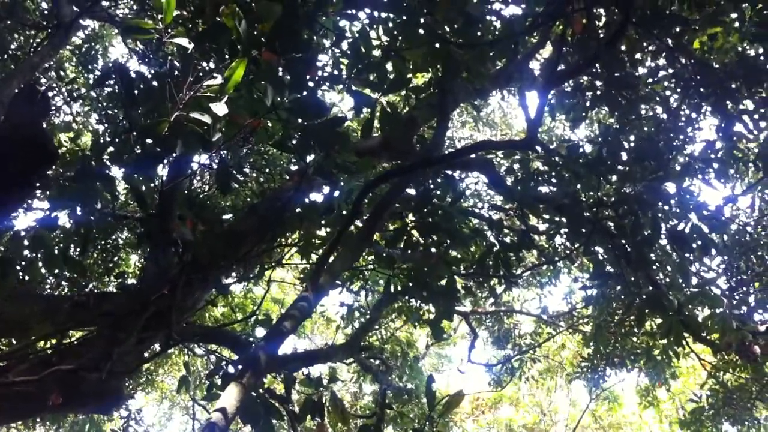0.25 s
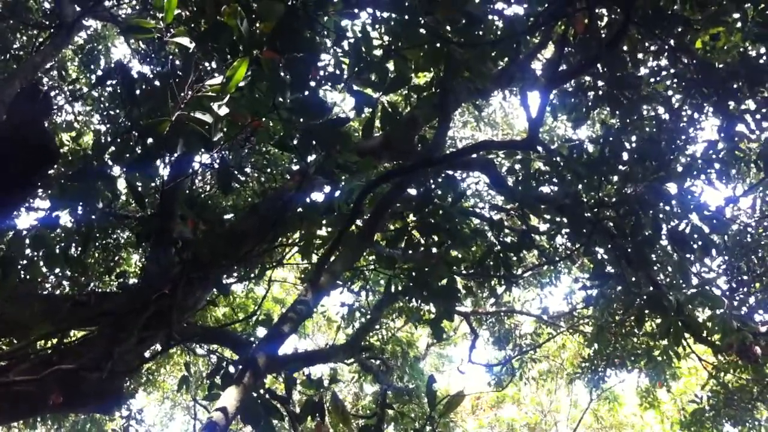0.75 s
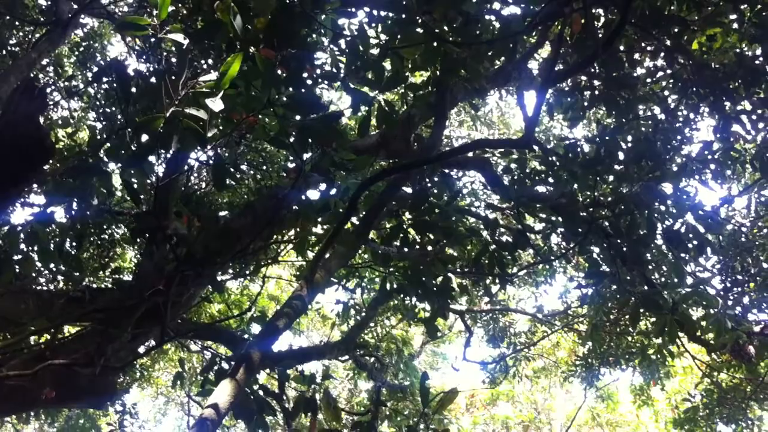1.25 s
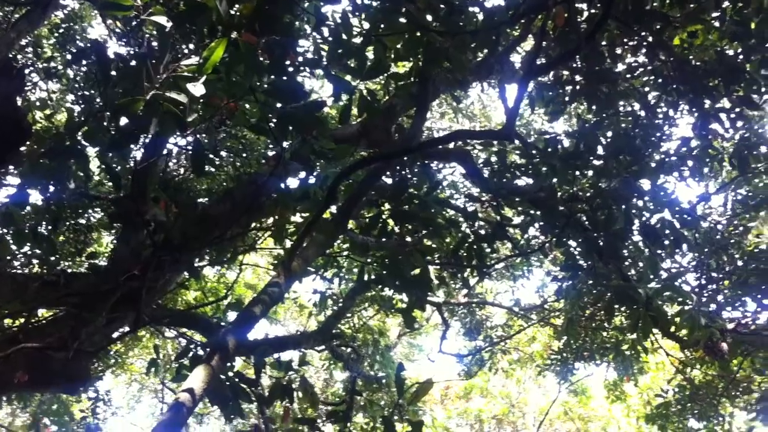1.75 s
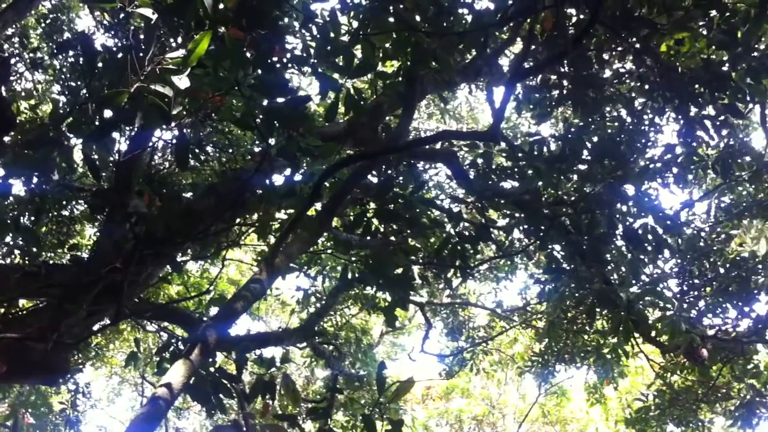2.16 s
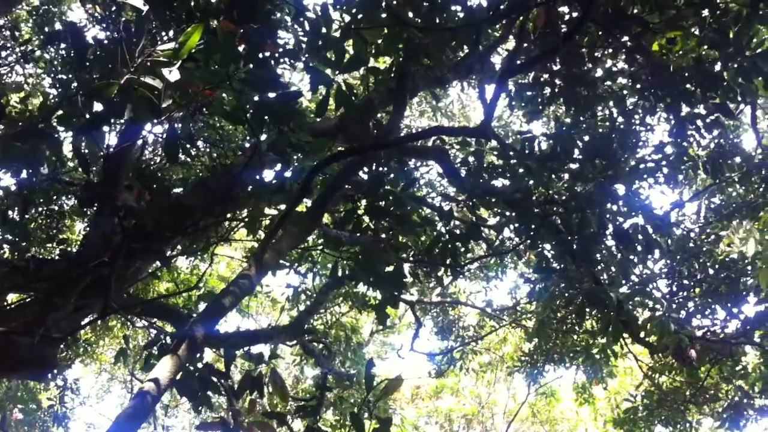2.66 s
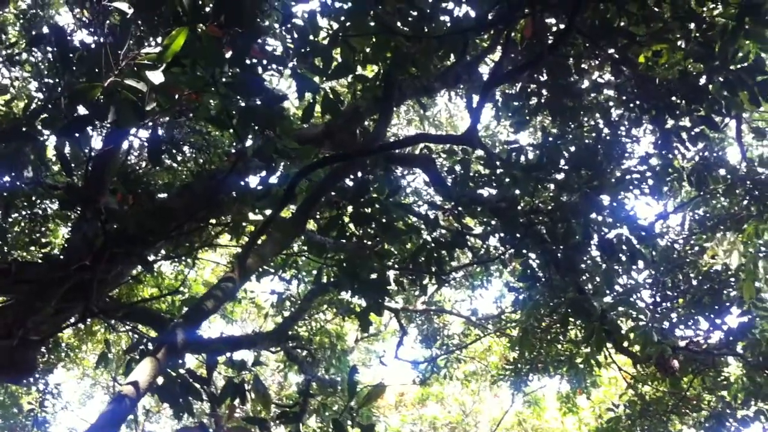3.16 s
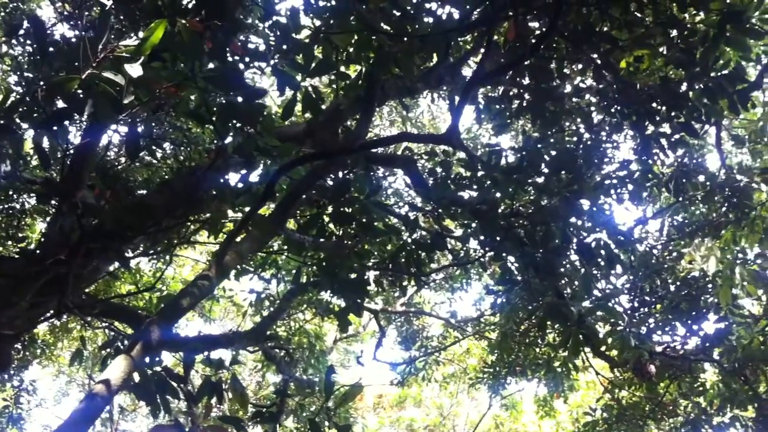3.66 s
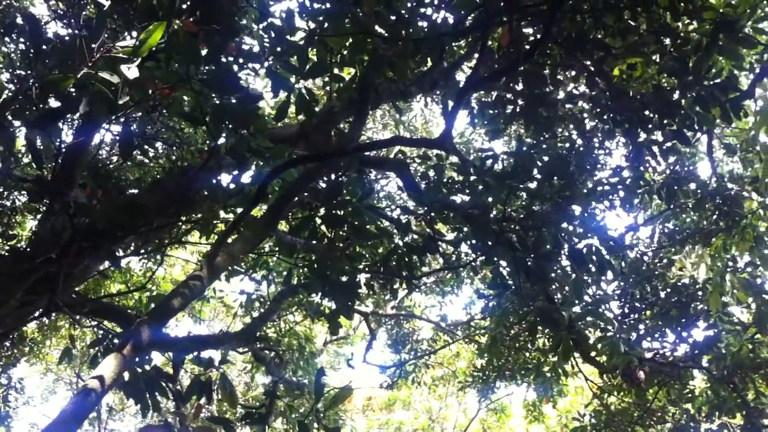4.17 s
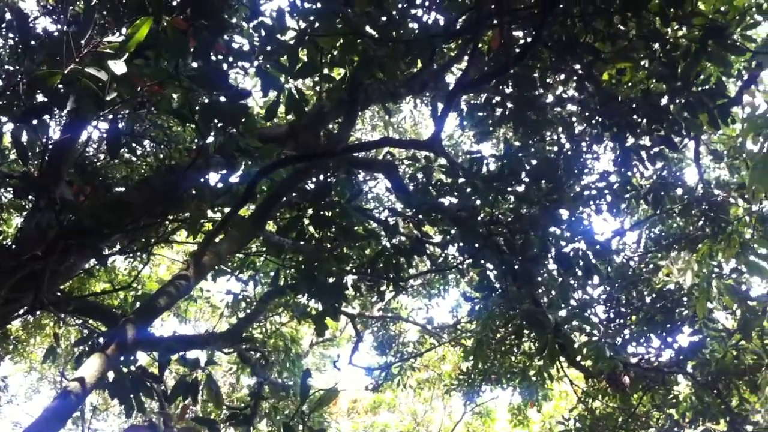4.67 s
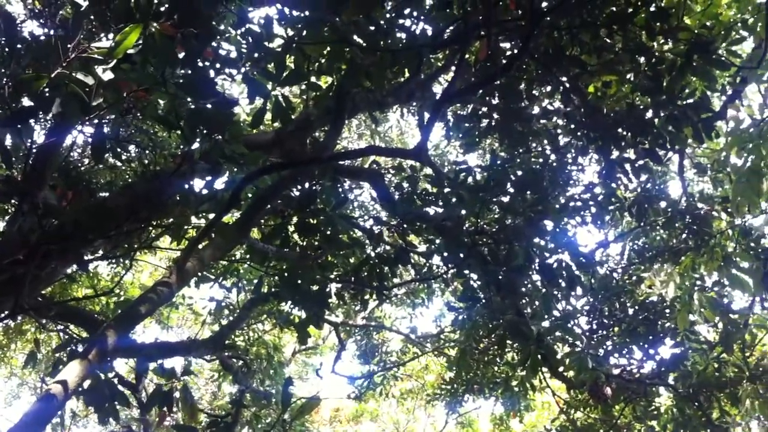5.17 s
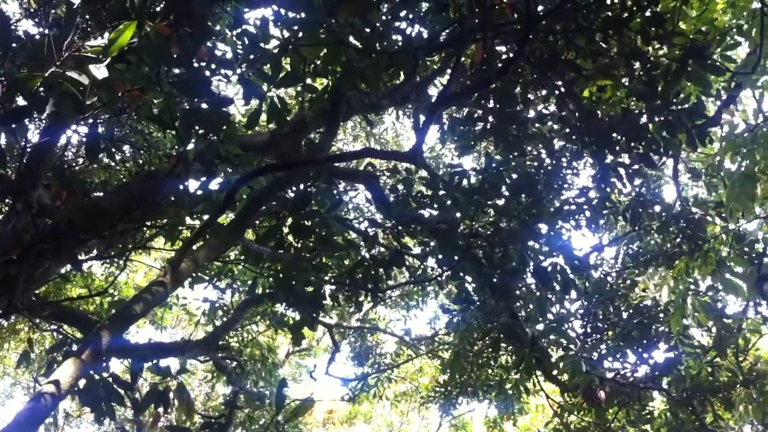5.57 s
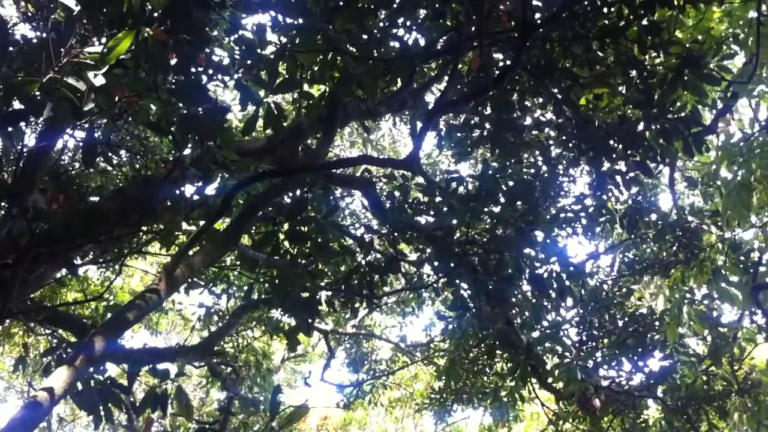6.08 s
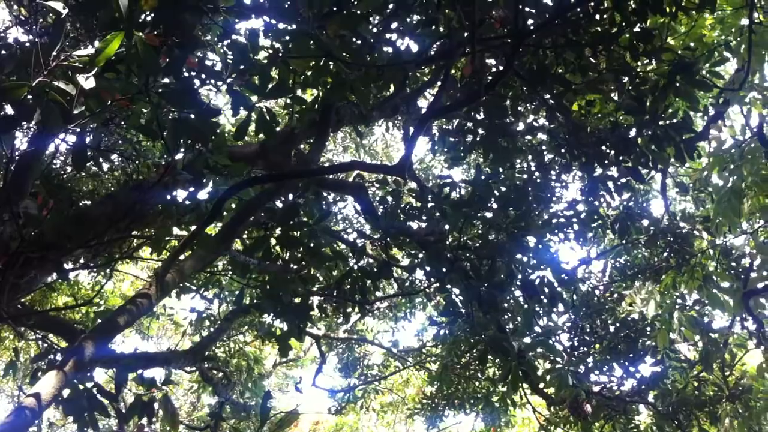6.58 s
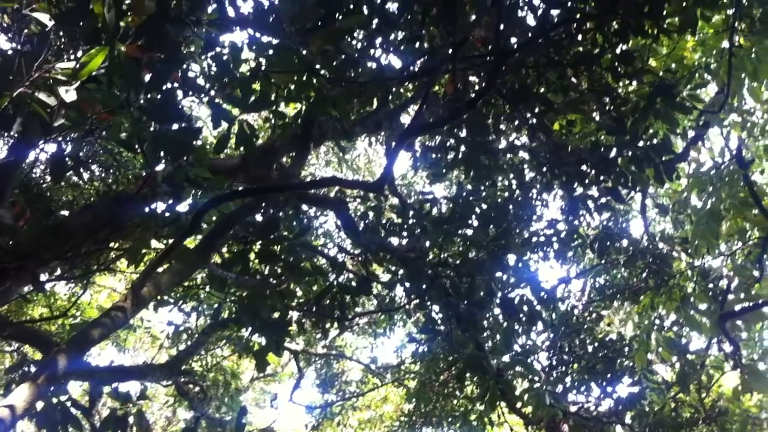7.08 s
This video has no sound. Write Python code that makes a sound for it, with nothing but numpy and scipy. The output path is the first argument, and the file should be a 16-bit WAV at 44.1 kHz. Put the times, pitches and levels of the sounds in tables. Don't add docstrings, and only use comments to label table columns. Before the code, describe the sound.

Quiet forest air with faint distant rumble and hiss, a soft knock on the microphone. At about half a second cicadas swell abruptly into a bright, piercing buzz, with nearer insects giving short gliding notes and raspy chirps. The chorus fades gradually and the chirps become rarer. A far bird keeps whooping low in quick clusters, clearer once the insects quieten; a small buzz returns near the end.

```python
import sys
import numpy as np
from scipy import signal
from scipy.fft import rfft, irfft, next_fast_len
from scipy.io import wavfile
from scipy.ndimage import uniform_filter1d

SR = 44100
rng = np.random.default_rng(int(sys.argv[2]) if len(sys.argv) > 2 else 0)


def log_audio(samples):
    frames = np.atleast_2d(samples).T
    limited = np.clip(frames, -1, 1)
    pcm = np.round(limited * 32767).astype(np.int16)
    wavfile.write(sys.argv[1], SR, pcm)


def gain_from_decibels(decibels):
    exponent = np.asarray(decibels, float) / 20
    return 10 ** exponent


N = 323253

# frequency_hz, density_db [dB per Hz]
CLICK_SPECTRUM = [(1200, -20), (3000, -9.5), (4800, 3), (6500, 4.5), (9000, 1), (10500, -8.5), (12000, -7),
                  (16000, -10.5)]


def unit(x):
    return x / np.sqrt(np.mean(np.abs(x) ** 2) + 1e-20)


def curves(rows):
    s, *cols = np.transpose(rows)
    return [np.interp(np.arange(N) / SR, s, c) for c in cols]


def wobble(rate, size=N):
    knots = rng.standard_normal(int(size * rate / SR) + 4)
    return np.interp(np.arange(size) * rate / SR, np.arange(len(knots)), knots)


def coloured(spectrum):
    m = next_fast_len(N)
    hz, db = np.transpose(spectrum)
    log_hz = np.log(np.fft.rfftfreq(m, 1 / SR) + 1)
    gain = gain_from_decibels(np.interp(log_hz, np.log(hz), db))
    return unit(irfft(rfft(rng.standard_normal(m)) * gain, m)[:N])


def trees(x, t60):
    t = np.arange(SR // 3) / SR
    tail = rng.standard_normal(len(t)) * gain_from_decibels(-60 * t / t60)
    tail = (tail / np.linalg.norm(tail)).astype(x.dtype)
    return signal.oaconvolve(x, tail[None], axes=1)[:, :N]


def song(pitch_hz, up, down, jitter, count, ribs=7.4):
    phase = 2 * np.pi * np.cumsum(pitch_hz) / SR + rng.uniform(0, 99.43)
    slow = 2 * np.pi * np.cumsum(pitch_hz / ribs) / SR
    beat = np.exp(1j * slow)
    throb = 1 + up * beat + down / beat + 0.03 * beat ** 2 + 0.13 * np.cos(slow / 2)
    turn = np.exp(1j * (phase + jitter * wobble(500, len(phase)))).astype(np.complex64)
    harmonics = np.cumprod(np.tile(turn, (count, 1)), axis=0)
    lag = np.exp(2j * np.pi * rng.random((count, 1))).astype(np.complex64)
    return (throb.astype(np.complex64) * lag * harmonics).real


def air():
    # frequency_hz, density_db [dB per Hz]
    rumble_spectrum = [(12, -54), (20, -34), (32, -46), (54, -36), (88, -13.5), (124, -10), (169, 0),
                       (586, -17.5), (938, -20.5), (1100, -20.5), (1500, -22.5), (1950, -8), (3300, -120)]
    # frequency_hz, density_db [dB per Hz]
    hiss_spectrum = [(1200, -14), (3000, -4.5), (4800, -5.5), (6500, -3), (9000, -3), (10500, -9),
                     (12000, -9), (16000, -3.5)]
    settled_db, start_excess_db, settling_s = -63.5, 3.5, 4.1
    rumble_db = settled_db + start_excess_db * np.exp(-np.arange(N) / SR / settling_s)
    rumble = gain_from_decibels(rumble_db + 1.26 * wobble(7.4)) * coloured(rumble_spectrum)
    return rumble + gain_from_decibels(-63.5 + 1.7 * wobble(4.9)) * coloured(hiss_spectrum)


def bumps():
    # start_s, peak_db, pitch_hz
    touches = [
        (0.049, -55, 110),
        (0.799, -61, 110),
        (1.054, -50.5, 113),
    ]
    out, t = np.zeros(N + SR), np.arange(SR // 10) / SR
    pulse = np.sin(np.pi * np.clip(t / 0.021, 0, 1))
    for s, db, hz in touches:
        out[round(s * SR):][:len(t)] += gain_from_decibels(db) * pulse * np.sin(2 * np.pi * hz * t)
    return out[:N]


def bird():
    # first_s, last_s, whoop_count, first_db, last_db
    whoop_runs = [(.225, .416, 4, -58, -57), (.496, .72, 2, -60, -61), (1.433, 1.66, 5, -65, -61),
                  (1.75, 1.83, 2, -61, -61), (1.917, 2.045, 3, -60, -54), (2.11, 2.212, 2, -63, -59),
                  (2.326, 2.578, 3, -56, -56), (2.674, 2.951, 4, -55, -67), (3.615, 3.73, 3, -61, -55),
                  (3.802, 3.868, 2, -54, -56), (3.912, 4.006, 3, -59, -61), (4.673, 4.862, 3, -65, -61),
                  (5.688, 5.915, 5, -63, -61), (6.05, 6.251, 4, -57, -55), (6.342, 6.449, 2, -57.5, -57.5),
                  (6.525, 6.64, 2, -63, -65), (6.802, 6.898, 2, -65, -60), (6.994, 7.11, 2, -56, -55),
                  (7.201, 7.285, 2, -54, -65)]
    top_hz, scatter_hz, whoop_s = 1200, 35, 0.034
    usual_fall_hz, further_hz_per_db, soft_db = 350, 9, -60
    out, t = np.zeros(N + SR), np.arange(SR // 12) / SR
    progress = np.clip(t / whoop_s, 0, 1)
    for first, last, count, first_db, last_db in whoop_runs:
        for s, db in np.linspace([first, first_db], [last, last_db], round(count)):
            fall_hz = usual_fall_hz + further_hz_per_db * (db - soft_db)
            pitch_hz = top_hz + rng.normal(0, scatter_hz) - fall_hz * progress ** 0.7
            shape = np.sin(np.pi * progress) * gain_from_decibels(3.5 * wobble(150, len(t)))
            tone = np.sin(2 * np.pi * np.cumsum(pitch_hz) / SR)
            out[round((s - 0.008) * SR):][:len(t)] += gain_from_decibels(db - 3.8) * shape * tone
    return out[:N]


def chorus():
    # time_s, pitch_hz
    chorus_pitch = [(0, 1820), (.18, 1840), (.28, 1940), (.65, 1965), (1.2, 1945), (3, 1918), (5, 1900),
                    (6.3, 1885), (7.33, 1935)]
    # time_s, level_db
    mellow_effort = [(0, -78), (.39, -60.5), (.61, -48.5), (.74, -35), (.9, -30.5), (1.28, -35),
                     (1.45, -35.5), (2.1, -36.5), (2.2, -38), (2.9, -45.5), (3.1, -50.5), (3.9, -64),
                     (5.6, -72.5), (6.5, -66.5), (7.33, -57.5)]
    # time_s, level_db
    shrill_effort = [(0, -73), (.16, -61), (.39, -77), (.6, -53), (.72, -36.5), (1.5, -38.5), (2.1, -39.5),
                     (2.9, -47), (3.9, -51), (4.7, -54.5), (5.68, -61), (5.8, -49.5), (6.1, -50.5),
                     (6.25, -61.5), (6.6, -60), (7.2, -70), (7.33, -60)]
    mellow_harmonics = [-5, -1, -28.5, -20.5, -41, -32, -48, -46]
    shrill_harmonics = [-5.5, -18.5, -8.5, -0.5, -10, -23, -34, -30]
    far_harmonics = [-59, -84.5, -66.5, -78, -106, -104, -100, -100]

    rows = 0
    middle_hz = curves(chorus_pitch)[0]
    for spread in np.linspace(-1, 1, num=8):
        pitch_hz = middle_hz + 68 * spread + 30 * wobble(6) + 14 * wobble(45)
        rasp = 1 + 0.4 * wobble(260) + 0.42 * wobble(600)
        ribs = rng.uniform(6, 10) + wobble(4)
        voice = song(pitch_hz, 0.12, 0.1, jitter=0.18, count=8, ribs=ribs)
        loudness = gain_from_decibels(2.4 * wobble(9) - 8 * spread ** 2)
        rows = rows + (loudness * rasp).astype(np.float32) * voice
    rows = trees(rows, t60=0.33) + 0.31 * rows
    slow = np.sqrt(np.abs(uniform_filter1d(rows ** 2, SR // 8, axis=1)))

    mellow = gain_from_decibels(curves(mellow_effort)[0] + 2.4 * wobble(11))
    shrill = gain_from_decibels(curves(shrill_effort)[0] + 2.5 * wobble(10))
    far = gain_from_decibels(0.5 * wobble(7))
    crowds = [(mellow_harmonics, mellow), (shrill_harmonics, shrill), (far_harmonics, far)]
    levels = np.sqrt(sum(np.outer(gain_from_decibels(np.array(db)), effort) ** 2 for db, effort in crowds))
    rustle = levels[3] * gain_from_decibels(-16.5 + 2.2 * wobble(10)) * coloured(CLICK_SPECTRUM)
    body = signal.butter(3, 1663, "highpass", fs=SR, output="sos")
    return signal.sosfilt(body, np.sum(levels * rows / slow, axis=0)) + rustle


def soloists():
    # harmonics 1 to 8 level_db, upper_throb_share, lower_throb_share, jitter_rad, rise_s
    mellow_voice = [-18.5, -3, -21.5, -22.5, -28, -43, -50, -44], 0.35, 0.05, .09, .04
    shrill_voice = [-12.5, -22, -13.5, -0.5, -9.5, -29, -31, -39], 0.14, 0.15, 0.12, 0.022
    drone_voice = [0, -13, -4, 1, -7, -18, -26, -23], .2, .18, .2, .015
    chirp_voice = [-11, -15, -7, -1, -11, -24, -36, -38], .2, .12, .1, .015
    hoarse_voice = [-9, -8, -3, -2, -8, -20, -32, -30], .2, .2, .3, .012
    # start_s, length_s, pitch_hz at the start, level_db
    mellow_notes = [
        (.87, 0.14, 2161, -30.5),
        (1.155, 0.14, 2165, -32),
        (1.44, 0.13, 2160, -31),
        (1.715, 0.16, 2146, -32),
        (2.034, 0.15, 2137, -32.5),
        (.79, 0.079, 1914, -30),
        (1.04, 0.12, 1935, -32),
    ]
    # start_s, length_s, pitch_hz at the start, level_db
    shrill_notes = [(.67, 0.063, 1932, -37.5), (.94, 0.057, 1928, -30.5), (1.12, 0.032, 1940, -44),
                    (1.21, 0.098, 1945, -32.5), (1.45, 0.05, 1923, -36.5), (1.56, 0.071, 2020, -42),
                    (1.65, 0.095, 1903, -44), (1.78, 0.027, 1937, -38), (2.21, 0.065, 1990, -49),
                    (2.52, 0.057, 2004, -47), (2.84, 0.05, 1990, -45), (3.21, 0.051, 2002, -45),
                    (3.53, 0.046, 1898, -44), (3.69, 0.059, 1940, -45.5), (3.8, 0.069, 1930, -48.5),
                    (4.07, .08, 2005, -56), (5.08, .08, 2000, -58), (5.13, 0.048, 1912, -56),
                    (5.48, 0.11, 1905, -58), (6.31, 0.042, 1910, -60), (6.95, 0.07, 2009, -65)]
    # start_s, length_s, pitch_hz at the start, level_db
    drone_notes = [
        (.155, .055, 1780, -51),
        (.22, .06, 1790, -62),
        (5.72, 0.28, 1907, -53.5),
        (5.92, .22, 1895, -55.5),
        (6.495, 0.057, 1852, -49),
    ]
    # start_s, length_s, pitch_hz at the start, level_db
    hoarse_notes = [
        (0.439, .05, 1880, -63.5),
    ]
    # start_s, level_db
    chirp_times = [
        (.825, -38),
        (1.075, -38.5),
        (1.35, -38),
        (1.615, -34),
        (1.92, -37),
        (2.69, -43),
        (3.19, -45.5),
        (3.65, -46),
        (4.34, -50),
        (4.89, -58),
    ]
    chirp_s, chirp_hz, chirp_top_s, tiring_hz_per_s = 0.058, 2156, 1.1, 34
    hoarse_after_s = 2.5

    out = np.zeros(N + SR)
    rustle = gain_from_decibels(-22) * coloured(CLICK_SPECTRUM)
    chirps = [(s, chirp_s, chirp_hz - tiring_hz_per_s * abs(s - chirp_top_s), db) for s, db in chirp_times]
    clear = [c for c in chirps if c[0] < hoarse_after_s]
    hoarse = [c for c in chirps if c[0] >= hoarse_after_s]
    # voice, sag of the pitch [Hz per s], notes
    singers = [(mellow_voice, 330, mellow_notes), (shrill_voice, 30, shrill_notes),
               (chirp_voice, 0, clear), (hoarse_voice, 0, hoarse + list(hoarse_notes)),
               (drone_voice, 60, drone_notes)]
    t = np.arange(SR // 4) / SR
    for (voice_db, up, down, jitter, rise), sag, notes in singers:
        for s, length, start_hz, db in notes:
            start = round(s * SR)
            pitch_hz = start_hz - sag * t + 7 * wobble(64.4, len(t))
            edge = np.clip(np.minimum(t / rise, (length + 0.02 - t) / 0.032), 0, 1)
            tone = gain_from_decibels(np.array(voice_db)) @ song(pitch_hz, up, down, jitter, count=8)
            tone = tone + gain_from_decibels(voice_db[3]) * rustle[start:][:len(t)]
            loudness = gain_from_decibels(db + 3.5 + 2.5 * wobble(45, len(t)))
            rasp = 1 + 0.22 * wobble(500, len(t))
            out[start:][:len(t)] += loudness * edge * rasp * tone
    return out[:N]


def scene():
    near = soloists()[None]
    far = bird()[None]
    echo = gain_from_decibels(-7.5) * trees(near, t60=0.51)
    far_echo = gain_from_decibels(-8) * trees(far, t60=0.5)
    return near + echo + far + far_echo + chorus() + air() + bumps()


def masked(x):
    # frequency_hz, margin_db relative to the neighbourhood
    threshold = [(600, -38), (3500, -32), (4700, -20), (7000, -14), (9000, -11), (10400, -6), (12500, -.5),
                 (14500, 1.5), (15500, .5)]
    frame = dict(window="cosine", nperseg=2048, noverlap=1024)
    lead = 189
    hz, _, z = signal.stft(np.pad(x, [(0, 0), (lead, 0)]), SR, **frame)
    power = np.abs(z) ** 2
    narrow = uniform_filter1d(uniform_filter1d(power, size=7, axis=1), size=2, axis=2)
    wide = uniform_filter1d(power, size=70, axis=1)
    margin = gain_from_decibels(2 * np.interp(hz, *np.transpose(threshold)))[:, None]
    luck = uniform_filter1d(rng.standard_normal(z.shape), size=9, axis=1)
    margin = margin * gain_from_decibels(5 * unit(luck))
    kept = 1 / (1 + (margin * wide / (np.abs(narrow) + 1e-30)) ** 20)
    return signal.istft(z * kept, SR, **frame)[1][:, lead:lead + N]


def top_cut(x):
    return signal.sosfilt(signal.butter(12, 15640, fs=SR, output="sos"), x)


def record(dry):
    mix = masked(dry)
    return top_cut(mix)


dry = scene()
out = record(dry)
log_audio(out)
```